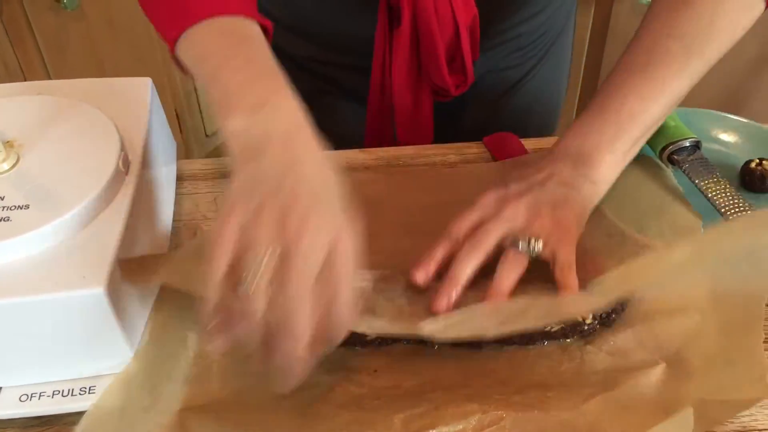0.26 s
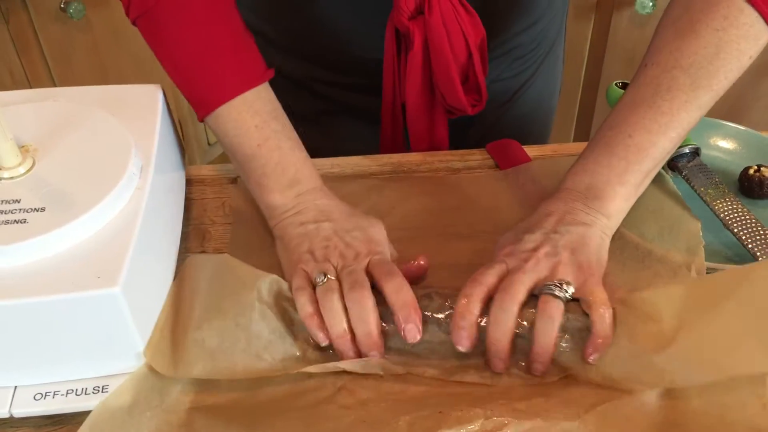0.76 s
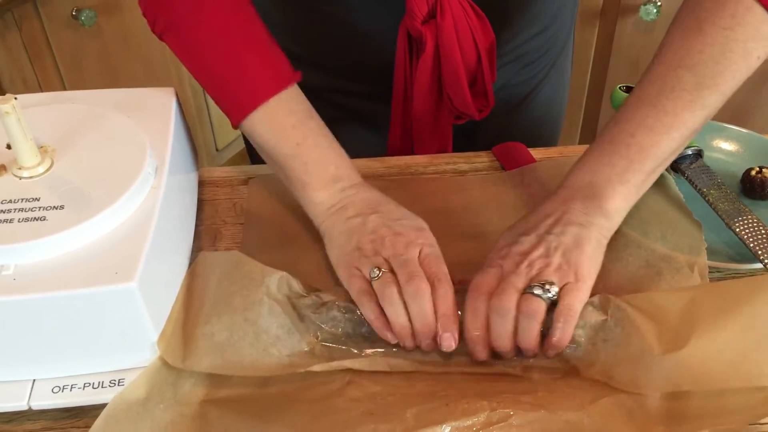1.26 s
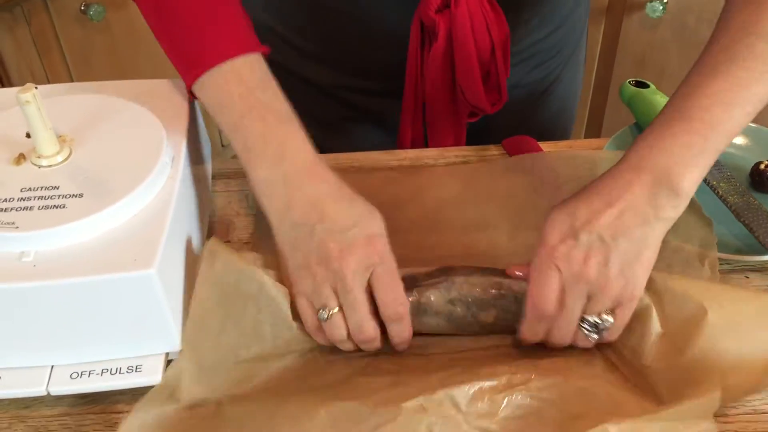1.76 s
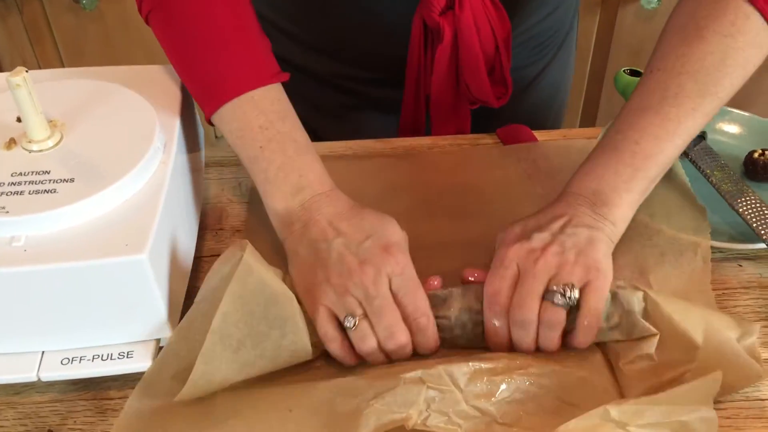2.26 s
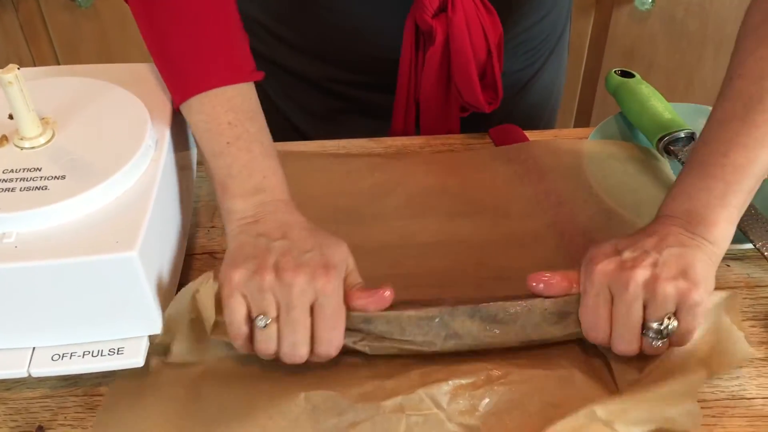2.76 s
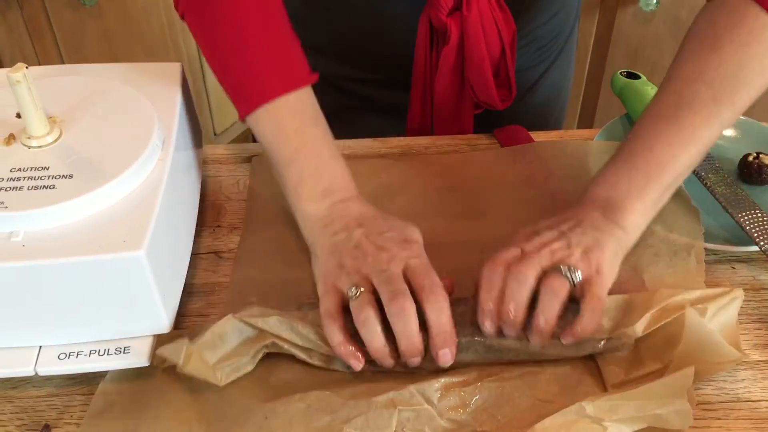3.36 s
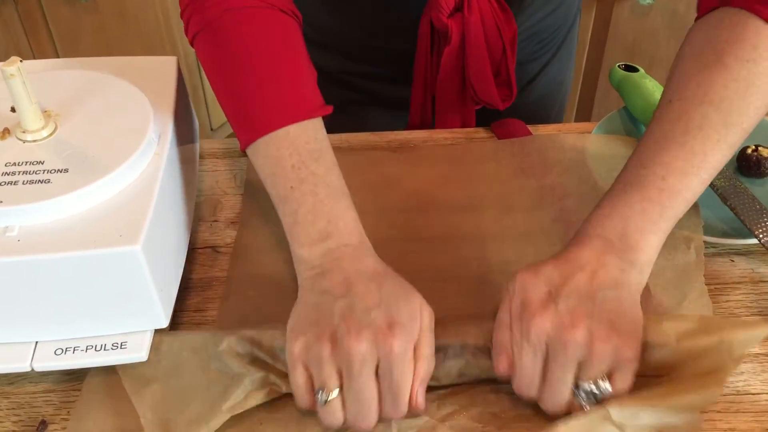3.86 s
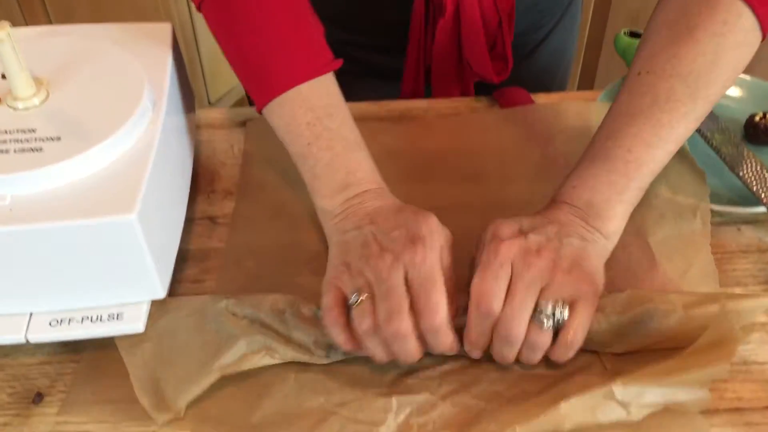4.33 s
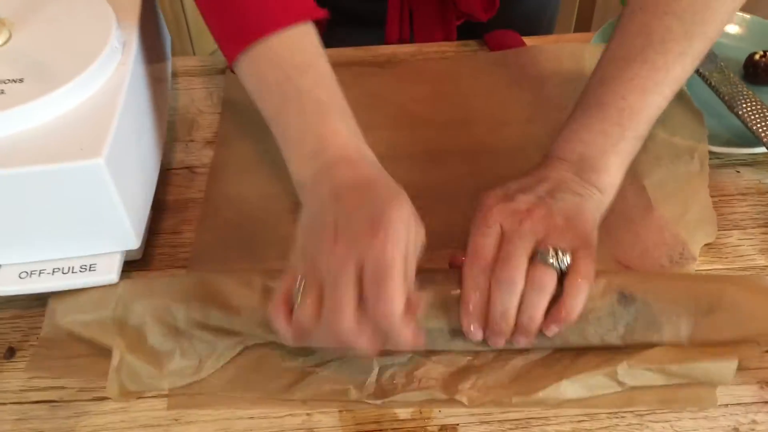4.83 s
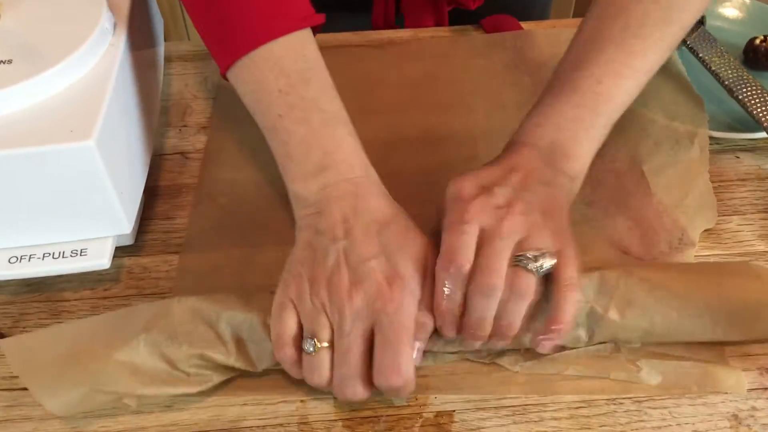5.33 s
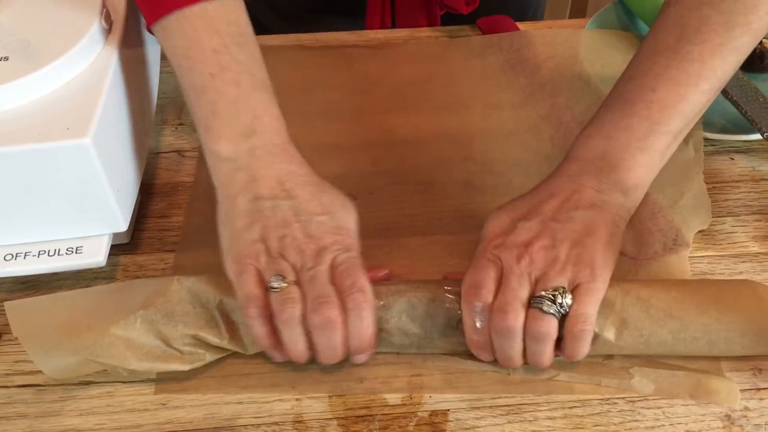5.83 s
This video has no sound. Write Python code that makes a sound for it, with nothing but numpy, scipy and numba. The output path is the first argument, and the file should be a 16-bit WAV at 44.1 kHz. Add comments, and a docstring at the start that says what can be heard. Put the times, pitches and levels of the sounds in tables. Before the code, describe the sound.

Hands fold stiff parchment over a soft food log on a wooden board. It begins with a light rustle, then bursts of sharp crinkling as the paper is smoothed and tucked, with a few dull hollow pats. Rolling follows in uneven strokes of crackle and sliding paper, with a brief lull midway, then lighter presses at the end. Close microphone, small quiet kitchen, faint short tail, same sound in both channels.

```python
"""A small kitchen: two hands fold parchment paper over a soft food log and roll it up on a wooden board, close by.
Each stroke of the hands loads the paper, holds and lets go: noise bursts ring facets of the sheet as creases
snap through, thousands of tiny ones merge into a rustle, and filtered noise slides and flexes the sheet.
Fingers pat the roll with hollow pops, the log rumbles dully when shoved along the board,
and the kitchen adds a soft noise bed and a faint tail. Both channels carry the same mono sound."""
import sys
import numpy as np
from scipy import signal
from scipy.fft import rfft, irfft, next_fast_len
from scipy.io import wavfile
from numba import njit

SR = 44100
rng = np.random.default_rng(int(sys.argv[2]) if len(sys.argv) > 2 else 0)


def dump_mix(stems):
    """Bounce the given channels to the path in sys.argv[1] as a 16-bit WAV at rate SR."""
    frames = np.atleast_2d(stems).T  # one column per channel
    limited = np.clip(frames, -1, 1)  # hard clip at full scale
    pcm = np.round(limited * 32767).astype(np.int16)
    wavfile.write(sys.argv[1], SR, pcm)


N = 268596
TIME = np.arange(N) / SR


def undb(db):
    """Decibels to gain."""
    return 10 ** (np.asarray(db) / 20)


def unit(x):
    """Scale to rms 1 along the last axis."""
    return x / np.sqrt(np.mean(np.abs(x) ** 2, axis=-1, keepdims=True) + 1e-20)


def resonance(f, hz, width):
    """Complex band-pass response, 1 at the centre."""
    return 1j * f * width / (hz ** 2 - f ** 2 + 1j * f * width)


def shape(x, response):
    """Filter by a response given as a function of frequency."""
    size = next_fast_len(N + 8192)
    f = np.arange(size // 2 + 1) * SR / size
    return irfft(rfft(x, size) * response(f), size)[:N]


def colour(x, points):
    """Filter by (frequency [Hz], gain [dB]) points joined on a log-frequency axis."""
    hz, db = np.transpose(points)
    return shape(x, lambda f: undb(np.interp(np.log(f + 1), np.log(hz), db)))


@njit
def moving_band(x, hz, q):
    """Band-pass whose centre moves every sample, gain 1 at the centre."""
    y, band, low = np.empty(len(x)), 0., 0.
    for i in range(len(x)):
        g = np.tan(np.pi * hz[i] / SR)
        v = (band + g * (x[i] - low)) / (1 + g * (g + 1 / q))
        band = 2 * v - band
        low = low + 2 * g * v
        y[i] = v / q
    return y


def walk(rate):
    """Bounded random curve of rms 1: straight lines between values drawn rate times a second."""
    return unit(np.interp(TIME * rate, np.arange(8192), rng.uniform(-1, 1, 8192)))


def place(times, sounds):
    """Sum short sounds, one a row, at their times."""
    starts = np.maximum(times * SR, 0).astype(int)[:, None]
    at = starts + np.arange(sounds.shape[1])
    return np.bincount(at.ravel(), sounds.ravel(), N)[:N]


def buckle(times, ring_db, crack_db, facet_hz, run_ms, facet_q, crack_hz, crack_width_hz, size,
           clean_db=11.0, skirt_q=0.63):
    """Creases buckle: each rings its facet and cracks in the treble; levels count the energy as if over 1 ms."""
    tail_db, tail_ms = -17, 2.6
    flip_db, flip_crack_db = -8, -10
    ms = np.arange(size) * 1000 / SR
    progress = ms / np.maximum(run_ms / 2, .08)[:, None]
    # a short avalanche of slips, then bending waves die out across the sheet
    avalanche = np.sqrt(progress) * np.exp(-progress)
    swell = avalanche + undb(tail_db) * np.exp(-ms / tail_ms)
    slips = unit(rng.standard_normal((len(times), size)) * swell) / np.sqrt(size)
    # at the height of the avalanche the facet flips over in one jolt, either way
    flip = np.diff(progress > .5, axis=1, prepend=False) * rng.choice([-1, 1], (len(times), 1))
    # a facet that pops with little crack rings longer: q doubles at clean_db of ring over crack, and no further
    q = facet_q * 2 ** (np.clip(ring_db - crack_db, 0, clean_db) / clean_db)[:, None]
    f, hz = np.arange(size // 2 + 1) * SR / size, facet_hz[:, None]
    facet = resonance(f, hz, hz / q) * resonance(f, hz, hz / skirt_q) * resonance(f, 1450, 4600)
    treble = resonance(f, crack_hz, crack_width_hz) ** 3
    ring = irfft(rfft(slips + undb(flip_db) * flip) * facet)
    crack = irfft(rfft(slips + undb(flip_crack_db) * flip) * treble)
    sounds = unit(ring) * undb(ring_db)[:, None] + unit(crack) * undb(crack_db)[:, None]
    return place(times, sounds / np.sqrt(ms[-1]))


def kitchen_bed():
    """The kitchen at rest: steady noise in the colour of the room, at rms 1."""
    # relative colour: (frequency [Hz], gain [dB])
    kitchen_colour = [(20, -12), (45, 0), (65, -0.5), (120, 2), (290, -11), (600, -1), (2000, 2),
                      (15000, -18)]
    return unit(colour(rng.standard_normal(N), kitchen_colour))


def hands():
    """Strokes load the paper, sag while held and dull as they die away; gives work, crispness and flexing in dB."""
    # The edge is folded over the log, smoothed and tucked; the log is drawn back tight in the fold,
    # then come three turns, with a new grip before the second, and last light presses:
    # (start [s], rise [s], hold [s], work level [dB], crack over ring [dB], flexing re work [dB])
    strokes = [ (0, .005, .012, -33.5, -5, -8), (0.026, .02, .09, -39.5, -5, -4),
               (0.158, .02, .06, -38, -5.5, -5.5), (0.244, .045, .022, -25.5, -0.5, -9.5),
               (.322, .025, .02, -30.5, -4.5, -14), (0.478, .006, .02, -33.5, -3.5, -11),
               (.5, .035, .025, -28, -6, -16), (0.575, .03, .105, -32.5, -4.5, -13),
               (.7, .055, .04, -25, -5.5, -21.5), (0.794, .03, .07, -28, -1, -21),
               (0.9, .03, .17, -34.5, -7, -12.5), (1.097, .03, .015, -38, -5, -10),
               (1.161, .025, .08, -41.5, -6, -10), (1.268, .025, .035, -36.5, -1, -16.5),
               (1.345, .035, .06, -33, -4, -13), (1.455, .075, .125, -29.5, -3.5, -11.5),
               (1.645, .07, .13, -26.5, -1, -11), (1.85, .04, .11, -32.5, -2, -13),
               (2.015, .025, .11, -37.5, -6.5, -6.5), (2.136, .035, .055, -30, -3, -14),
               (2.22, .04, .045, -27, -3, -14.5), (2.33, .085, .08, -28.5, -5.5, -16.5),
               (2.502, .025, .06, -27.5, -2.5, -14.5), (2.598, .06, .035, -24.5, -1.5, -12.5),
               (2.694, .04, .025, -28, -2.5, -11), (2.755, .035, .155, -30, -5.5, -10.5),
               (2.93, .16, .05, -26, -5.5, -19), (3.14, .025, .012, -34, 1, -7),
               (3.335, .03, .08, -38.5, -7, -15.5), (3.452, .04, .14, -31, -3.5, -17),
               (3.635, .055, .08, -29, -6.5, -19), (3.757, .06, .115, -27.5, -4.5, -12.5),
               (3.934, .03, .02, -26.5, -1.5, -19), (3.985, .03, .135, -32.5, -4.5, -13),
               (4.15, .05, .085, -33, -6, -13), (4.278, .035, .1, -33.5, -2.5, -20),
               (4.409, .035, .1, -31.5, -3.5, -9.5), (4.548, .03, .065, -30.5, 2, -14),
               (4.656, .03, .075, -34, -3.5, -12), (4.768, .02, .03, -33, -3, -12.5),
               (4.864, .035, .1, -26.5, -5.5, -19), (5.012, .035, .14, -24.5, -3.5, -16.5),
               (5.19, .035, .125, -28, -3, -17), (5.34, .02, .03, -33.5, -3, -21),
               (5.4, .02, .04, -40, -6, -14), (5.46, .06, .055, -30.5, -6.5, -28),
               (5.591, .02, .05, -37.5, -8, -23), (5.653, .03, .06, -32, -0.5, -18),
               (5.779, .04, .115, -39.5, -2, -15), (5.928, .055, .025, -31, -4, -16),
               (6.02, .02, .05, -37, -5, -20)]
    # hands lying on the paper: (work level [dB], crack over ring [dB], flexing re work [dB])
    resting = (-53, -10, -23)
    sag_db_per_s, release_db_per_s = 12, 190  # the paper yields while held and settles once let go
    dulling = 0.23  # dB of crispness lost for each dB that a released stroke dies away
    rest_db, rest_crisp_db, rest_flex_db = resting
    # overlapping strokes add in power; crispness and flexing are averaged by power
    total = undb(rest_db) ** 2
    crisp, flex = total * rest_crisp_db, total * rest_flex_db
    for start, rise, hold, db, crisp_db, flex_db in strokes:
        held = TIME - start - rise
        release_db = release_db_per_s * np.clip(held - hold, 0, 1)
        fall_db = sag_db_per_s * np.clip(held, 0, hold) + release_db
        load = np.clip((TIME - start) / rise, 0, 1)
        power = (load * undb(db - fall_db)) ** 2
        total = total + power
        crisp = crisp + power * (crisp_db - dulling * release_db)
        flex = flex + power * flex_db
    return 10 * np.log10(total), crisp / total, flex / total


def facet_pitch():
    """Typical facet pitch in Hz over time, higher while fingertips tuck than while palms roll."""
    # (time [s], pitch [Hz])
    pitch_points = [(0, 2600), (.65, 2200), (.85, 2520), (1.5, 2220), (2.3, 2140), (3.1, 2030), (3.3, 2660),
                    (3.55, 2640), (3.8, 2160), (4.35, 2400), (5.0, 2280), (6.09, 2220)]
    return np.interp(TIME, *np.transpose(pitch_points))


def rustle(work_db, crisp_db, facet_hz, count=6500, crowding=.68, size_spread_db=4.7,
           crack_spread_db=3.0, octaves=0.7, run_ms=.7):
    """Countless small creases, each with its own facet, crowd under hard work and thin out in lulls."""
    # relative colour of the rustling sheet: (frequency [Hz], gain [dB])
    paper_colour = [(150, -38), (350, -30), (600, -0.5), (1000, -5.5), (1500, -6.5), (2500, -9.5),
                    (4000, -3.5), (6500, -1.5), (10000, -4), (15000, -5.5)]
    density = undb(crowding * work_db)
    density = density / density.mean()
    order = (np.arange(count) + rng.uniform(0, 3, count)) / count
    times = np.interp(order, np.cumsum(density) / N, TIME)
    size, edge, pitch, run = np.clip(rng.standard_normal((count, 4)), -2, 2).T
    # where creases are few, each carries more of the sound
    local_density = np.maximum(np.interp(times, TIME, density), .3)
    ring = size_spread_db * size - 10 * np.log10(local_density)
    crack = ring + np.interp(times, TIME, crisp_db) + crack_spread_db * edge
    hz = np.clip(np.interp(times, TIME, facet_hz) * 2 ** (octaves * pitch), 400, 8000)
    grains = buckle(times, ring, crack, hz, run_ms * np.exp(.5 * run), facet_q=3.0,
                    crack_hz=8340, crack_width_hz=16000, size=256)
    return colour(grains, paper_colour) / np.sqrt(np.mean(undb(ring) ** 2))


def sliding(catch_db=3.5):
    """Paper drags over paper: coloured noise whose level wavers as it catches and lets go."""
    # relative colour of the slide: (frequency [Hz], gain [dB])
    slide_colour = [(150, -42), (400, -23.5), (800, -6), (1400, -4), (2200, -6), (4000, -7.5), (7000, -12),
                    (15000, -28)]
    return unit(colour(rng.standard_normal(N), slide_colour)) * undb(catch_db * walk(130))


def span(x, q=2.4, wander_octaves=0.31, makeup_db=1.95):
    """The free span of paper between the hands rings broadly, and its pitch wanders as the grip shifts."""
    # high in a tight tuck, low on the loose roll, before the wander and make-up gain:
    # (time [s], centre [Hz], lift at the centre [dB])
    span_points = [(0, 2040, 3), (.55, 2210, 6.5), (.75, 3200, 1.5), (1.35, 3130, 7), (1.8, 3030, 2.5),
                   (2.05, 3470, 5.5), (2.4, 2500, 3), (2.7, 1460, 4.5), (2.92, 3100, 1), (3.1, 1290, 3),
                   (3.5, 1880, 6), (4.0, 1850, 2.5), (4.45, 2250, 5), (4.65, 1760, 2.5), (5.1, 1800, 3.5),
                   (5.55, 2220, 4.5), (5.75, 1600, 3.5), (6.09, 1380, 2)]
    s, hz, lift_db = np.transpose(span_points)
    centre = np.interp(TIME, s, hz) * 2 ** (wander_octaves * walk(45))
    lift = undb(np.interp(TIME, s, lift_db)) - 1
    return undb(makeup_db) * (x + lift * moving_band(x, centre, float(q)))


def flexing():
    """The broad sheet bends: noise excites its low modes, which alternate in sign."""
    # broad modes of the whole sheet: (frequency [Hz], width [Hz], relative level [dB])
    sheet_modes = [(169, 26, -8), (274, 20.5, -0.5), (350, 97, 6), (530, 1070, -1)]

    def modes(f):
        return sum((-1) ** k * undb(db) * resonance(f, hz, width)
                   for k, (hz, width, db) in enumerate(sheet_modes))

    bent = shape(rng.standard_normal(N), modes)
    return unit(shape(bent, lambda f: resonance(f, 390, 2400)))


def snaps(run_share=1.1):
    """The big creases snap through, each heard by itself."""
    # run time is stretched by run_share:
    # (time [s], facet ring [dB], sharp crack [dB], facet pitch [Hz], time the crease takes to run [ms])
    snap_events = [(0.0395, -32, -28, 3730, 1.5), (.054, -42, -24, 3600, 2.5),
                   (0.109, -35.5, -34.5, 4260, 1.1), (0.149, -27.5, -23, 1980, 0.79),
                   (0.157, -25.5, -35, 2760, 0.8), (0.1795, -23.5, -25.5, 2455, 1.3),
                   (0.2093, -32, -38, 4070, 0.72), (0.257, -35, -28, 3000, 1.1),
                   (0.285, -15.5, -14.5, 1350, 2.7), (0.3026, -28, -14.5, 2320, 1.8),
                   (0.3124, -24, -17, 2785, 0.79), (0.333, -31, -18.5, 1357, 1),
                   (0.3632, -20, -27, 1320, 2.7), (0.4585, -35, -36, 2200, 2.2),
                   (.4618, -22, -20, 2600, 1.05), (0.4835, -26, -29, 1960, 2.5),
                   (0.5162, -19, -15.5, 1220, 5.8), (0.523, -13.5, -18.5, 1410, 2.6),
                   (0.543, -22, -23, 1500, 2.7), (.549, -14.5, -16, 1910, 0.93), (0.556, -16, -22, 2400, 2),
                   (0.57, -20, -18, 1940, 1.9), (0.581, -28, -32, 1700, 1), (.603, -15.5, -21, 2690, 0.59),
                   (0.6228, -19, -15, 1700, 1.6), (0.6327, -14, -17.5, 2260, 1.6),
                   (.662, -26, -19, 2210, 0.71), (0.705, -15.5, -34, 3470, 0.47),
                   (0.7102, -15.5, -36, 2780, 2.8), (0.722, -28, -21, 2490, 0.74),
                   (0.771, -17, -13.5, 3310, 1.3), (0.776, -14.5, -26, 3750, 0.57),
                   (0.8288, -12.5, -17, 3060, 0.28), (.8473, -14, -18, 3450, 1.1),
                   (0.8923, -14, -15, 3730, 1.9), (0.9018, -22, -29, 3500, 1), (.9212, -23, -26, 3500, 1),
                   (0.939, -18, -17.5, 3100, 2.4), (0.9528, -30, -26, 3400, .8),
                   (.9581, -35, -22, 3220, .7), (0.9956, -36, -34, 2300, 1), (1.01, -38, -22, 4400, 0.79),
                   (1.043, -26, -26, 3890, 1.4), (1.048, -17, -14.5, 3370, 3.1),
                   (1.064, -26, -28, 2340, 0.61), (1.1106, -20, -27, 4390, 1.8),
                   (1.1328, -18.5, -45, 2900, 2.8), (1.1425, -27, -40, 2550, 1.4),
                   (1.1522, -29, -25, 3300, .6), (1.1699, -18, -24, 3270, 1.8),
                   (1.1988, -31, -46, 2750, 1.3), (1.226, -23, -42, 2480, 0.71),
                   (1.233, -22.5, -24.5, 3360, 1.4), (1.2712, -17.5, -24, 2880, 4),
                   (1.287, -24, -37, 3040, 1.5), (1.317, -19, -37, 3720, 0.29),
                   (1.3444, -23, -35, 2880, 0.75), (1.357, -21, -28, 3030, 0.86),
                   (1.3729, -22, -16.5, 2790, 2.2), (1.3847, -10, -14.5, 3430, 1.1),
                   (1.4133, -37, -21, 3580, .7), (1.4601, -29, -41, 3620, .8),
                   (1.4803, -34, -29, 3480, 0.86), (1.505, -20, -18.5, 2420, 1.6),
                   (1.5269, -18, -26, 2350, 1.2), (1.543, -18, -31, 2200, 1.6),
                   (1.548, -14, -29, 2820, 2.2), (1.5584, -10.5, -7, 3230, 1.4),
                   (1.5687, -17.5, -24, 1990, 1.1), (1.6088, -14, -18, 3160, 0.47),
                   (1.6217, -12, -7.5, 2440, 5.1), (1.7591, -23, -16, 2900, 0.79),
                   (1.785, -16, -12, 3000, 1), (1.794, -18, -16, 960, 1.3), (1.809, -17, -17, 3600, 1.3),
                   (1.9023, -38, -38, 1750, 1.2), (1.924, -30, -30, 3680, 0.94),
                   (2.0004, -32, -24, 2910, .8), (2.0527, -27, -23, 3010, 1),
                   (2.1036, -21.5, -36, 970, 7.7), (2.1538, -15.5, -17.5, 1130, 2.3),
                   (2.1676, -23, -30, 2050, 1.7), (2.1903, -16.5, -20, 3500, 1.1),
                   (2.2285, -30, -12.5, 4570, 0.47), (2.2493, -19, -31, 2990, 1.2),
                   (2.2728, -16, -27, 3340, 0.67), (2.2816, -22, -18, 2000, 1.2),
                   (2.2912, -21, -28, 2720, 1), (2.305, -18.5, -17, 1630, 2.1),
                   (2.3091, -17, -22, 1630, 1.5), (2.4186, -18.5, -15.5, 2100, 1.2),
                   (2.497, -21, -16.5, 3070, 1), (2.5161, -11.5, -20, 3000, 0.25),
                   (2.536, -16, -12.5, 1890, 3.8), (2.5407, -13, -13, 4700, 2.6),
                   (2.5862, -23, -38, 1950, 1.2), (2.7273, -13, -9, 1590, 4.2),
                   (2.856, -16.5, -14, 2960, 2.3), (2.9344, -22, -18.5, 1900, 1.1),
                   (2.9434, -17, -21, 2180, 2), (3.0016, -26, -31, 2400, 1.2), (3.086, -20, -28, 1650, 1.4),
                   (3.11, -15.5, -16, 1710, 0.45), (3.1716, -28, -22, 2640, 1.3),
                   (3.1947, -28, -20.5, 4630, 1.5), (3.2852, -29.5, -35, 3400, 1),
                   (3.305, -30.5, -63, 3850, 1.9), (3.3249, -43, -43, 3900, 0.93),
                   (3.3593, -32, -29, 2530, 0.71), (3.3834, -29, -44, 2350, 1.2),
                   (3.392, -29, -42, 2130, 1.2), (3.399, -30, -40, 3360, 1.4),
                   (3.4133, -35, -29, 2780, 0.69), (3.4438, -20, -28, 2700, 4.6),
                   (3.4577, -17.5, -18.5, 2100, 1.9), (3.504, -22, -20, 2770, 0.56),
                   (3.626, -35, -22, 4400, 2.7), (3.6658, -19.5, -23, 1950, 1.4),
                   (3.694, -18, -26, 1300, 3.8), (3.722, -18.5, -19.5, 1890, 0.77),
                   (3.7811, -15, -22, 1600, 2.7), (3.8055, -18, -16.5, 1890, 0.62),
                   (3.8228, -15, -34, 2250, 2.7), (3.9031, -16, -13.5, 1990, 1.8),
                   (4.048, -18, -20, 1450, 3.9), (4.079, -24, -26, 1660, 1.8),
                   (4.1345, -27, -37, 2300, 0.8), (4.165, -20.5, -20.5, 1990, 2.5),
                   (4.187, -27, -23, 1240, 1.2), (4.2237, -20, -21, 2260, 1.4), (4.242, -22, -17, 2500, 2),
                   (4.26, -30, -21, 4600, 1.2), (4.2615, -17.5, -18, 1730, 5.1),
                   (4.2777, -21, -20, 2300, 0.61), (4.3093, -23, -30, 3450, 1.6),
                   (4.3657, -21, -28, 1760, 0.97), (4.377, -18, -21, 3060, 2.3),
                   (4.3851, -18, -16, 1940, 1.16), (4.451, -23.5, -21.5, 1330, 3.2),
                   (4.493, -31, -22, 3350, 1.1), (4.5333, -26, -23, 2840, 1), (4.571, -18.5, -21, 1340, 2),
                   (4.5892, -20, -13.5, 1950, 1.6), (4.637, -17.5, -22, 3260, 1.1),
                   (4.6556, -22, -18.5, 3910, 0.96), (4.685, -24, -20.5, 2350, 1.5),
                   (4.721, -24, -26, 2300, 1.9), (4.737, -26, -22, 1910, 0.65),
                   (4.7887, -16, -17.5, 2170, 2), (4.822, -19, -18, 1780, 1.6),
                   (4.8795, -10, -15, 1750, 0.67), (4.885, -14, -32, 2300, 1),
                   (4.9277, -13.5, -14.5, 2300, 1.6), (4.986, -16.5, -14.5, 1190, 3.8),
                   (5.023, -16, -16, 2600, 4.3), (5.045, -21.5, -21, 1060, 3),
                   (5.125, -13.5, -17, 1900, 1.3), (5.1625, -15, -15, 2100, 0.78),
                   (5.1687, -14, -11.5, 1400, 1.3), (5.2513, -21, -14, 3400, 1.4),
                   (5.311, -18, -17, 3600, 0.79), (5.328, -25, -17, 1350, 0.45),
                   (5.333, -18, -28, 1510, 1.3), (5.363, -20, -32, 2070, 1.2),
                   (5.3663, -22, -19, 1810, 0.98), (5.402, -21, -33, 1960, 0.83),
                   (5.418, -22, -19, 2700, 1.1), (5.456, -24, -26, 1360, 3.2),
                   (5.474, -30, -23, 1230, 0.39), (5.489, -21.5, -32, 3190, 1.5),
                   (5.5763, -36, -19.5, 3250, 0.53), (5.604, -23, -20, 2900, 1),
                   (5.609, -27, -35, 1845, 1.1), (5.6149, -30, -27, 3160, 1),
                   (5.6593, -24, -15.5, 3000, 0.5), (5.7295, -20, -34, 3030, 0.8),
                   (5.7612, -26, -17.5, 2250, 1.8), (5.771, -17.5, -18, 2470, 3),
                   (5.829, -18, -27, 1240, 0.99), (5.83, -23, -23, 1910, 1.4),
                   (5.878, -31, -29, 5200, 0.88), (5.898, -30, -41, 4900, 0.7),
                   (5.9213, -17, -21.5, 1280, 1.02), (5.9811, -21, -34, 1336, 1.3),
                   (5.9863, -20, -23, 2220, 1.5), (6.0585, -24.5, -22, 1260, 2.9)]
    s, ring, crack, hz, ms = np.transpose(snap_events)
    return buckle(s, ring, crack, hz, ms * run_share, facet_q=1.15,
                  crack_hz=5980, crack_width_hz=12100, size=1024)


def crackle(work_db, crisp_db, facet_hz, count=48, over_db=3.0, crack_db=3.0, spread_db=1.8,
            crack_spread_db=4.0, octaves=0.6, run_ms=1.5):
    """Middling creases give way at random, more often and louder under hard work."""
    chance = np.cumsum(undb(work_db))
    order = (np.arange(count) + rng.uniform(0, 1, count)) / count
    times = np.interp(order, chance / chance[-1], TIME)
    size, edge, pitch, run = rng.uniform(-1.5, 1.5, (count, 4)).T
    ring = np.interp(times, TIME, work_db) + over_db + spread_db * size
    crack = ring + np.interp(times, TIME, crisp_db) + crack_db + crack_spread_db * edge
    hz = np.interp(times, TIME, facet_hz) * 2 ** (octaves * pitch)
    return buckle(times, ring, crack, hz, run_ms * np.exp(.5 * run), facet_q=1.7,
                  crack_hz=6500, crack_width_hz=15000, size=1024)


def shoves(centre_hz=140, width_hz=400, gain_db=-2):
    """The heavy log is shoved against the board: low noise swells and fades as a dull rumble."""
    # level before gain_db; length is the spread of a bell-shaped swell:
    # (time of the peak [s], level [dB], length [s])
    shove_events = [(0.308, -39.5, 0.027), (0.553, -55.5, 0.066), (0.792, -54, 0.062), (1.55, -52, 0.039),
                    (1.788, -51, 0.064), (2.53, -48, 0.028), (5.064, -60, 0.042)]
    push = sum(undb(db + gain_db) * np.exp(-.5 * ((TIME - s) / length) ** 2)
               for s, db, length in shove_events)
    rumble = shape(rng.standard_normal(N), lambda f: resonance(f, centre_hz, width_hz) ** 4)
    return push * unit(rumble)


def pats(t60_s=0.039, rise_s=0.0013, gain_db=-5, q=6.7):
    """A soft fingertip crushes the paper over the roll: a noise burst rings as a dull, hollow pop."""
    # peak level before gain_db: (time [s], level [dB], pitch [Hz])
    pat_events = [(0.521, -25, 494), (0.936, -27.5, 393), (1.06, -29, 458), (1.127, -37, 380),
                  (1.375, -35, 286), (1.512, -20, 580), (1.515, -32, 206), (1.555, -23.5, 383),
                  (1.939, -33, 370), (2.152, -24.5, 607), (2.46, -33, 385), (2.728, -24, 333),
                  (4.785, -30, 495), (5.023, -31, 342), (5.617, -39, 288), (5.676, -38, 398)]
    s, db, hz = np.transpose(pat_events)
    t = TIME[:4096]
    envelope = np.exp(-np.log(1000) * t / t60_s) * (1 - np.exp(-t / rise_s))
    push = rng.standard_normal((len(s), len(t))) * envelope
    f = np.arange(len(t) // 2 + 1) * SR / len(t)
    pops = irfft(rfft(push) * resonance(f, hz[:, None], 2 * hz[:, None] / q) ** 2)
    pops = pops / np.abs(pops).max(axis=1, keepdims=True)
    return place(s, pops * undb(db + gain_db)[:, None])


def room(x, gap_s=0.0081, t60_s=.24, wet_db=-14, dull_hz=6000):
    """Cupboards and walls return a short, duller tail of decaying noise."""
    t = TIME[:16384]
    tail = rng.standard_normal(len(t)) * np.exp(-np.log(1000) * t / t60_s) * (t > gap_s)
    wet = signal.fftconvolve(x, tail / np.linalg.norm(tail))[:N]
    return x + undb(wet_db) * shape(wet, lambda f: 1 / (1 + 1j * f / dull_hz))


def scene(rustle_db=1.5, sliding_db=-7, kitchen_db=-60, jerk_db=-0.21):
    """The strokes drive rustle, crackle, sliding and flexing together; snaps, pats and shoves stand out of it."""
    work_db, crisp_db, flex_db = hands()
    facet_hz = facet_pitch()
    creases = undb(rustle_db) * rustle(work_db, crisp_db, facet_hz)
    sheet = span(creases + undb(sliding_db) * sliding()) + undb(flex_db) * flexing()
    # the paper gives way slightly unevenly
    worked = sheet * undb(work_db + jerk_db * walk(110))
    paper = worked + crackle(work_db, crisp_db, facet_hz) + snaps()
    mono = room(paper + pats() + shoves()) + undb(kitchen_db) * kitchen_bed()
    return np.array([mono, mono])


def record(dry):
    """The microphone port cuts two narrow dips, and a steep low-pass cuts off the top."""
    # (centre [Hz], width [Hz], depth [share of amplitude removed at the centre])
    port_dips = [(4856, 190, 0.4), (10480, 400, 0.73)]
    top_hz = 15350

    def port(f):
        return np.prod([1 - depth * resonance(f, hz, width) for hz, width, depth in port_dips], axis=0)

    heard = [shape(channel, port) for channel in dry]
    return signal.sosfilt(signal.ellip(10, .2, 70, top_hz, fs=SR, output="sos"), heard)


dry = scene()
out = record(dry)
dump_mix(out)
```